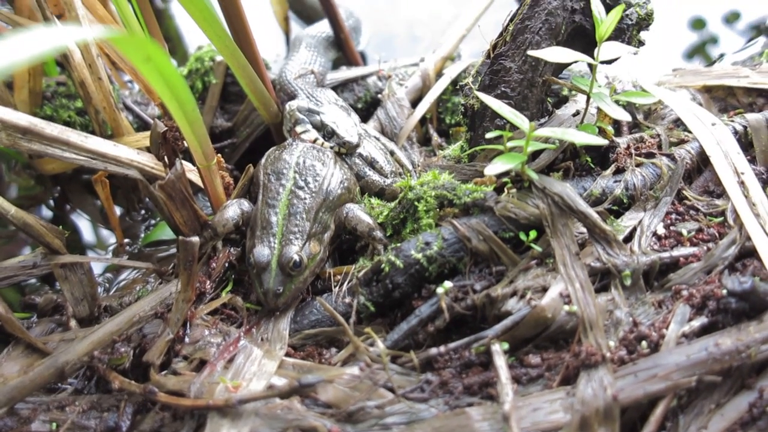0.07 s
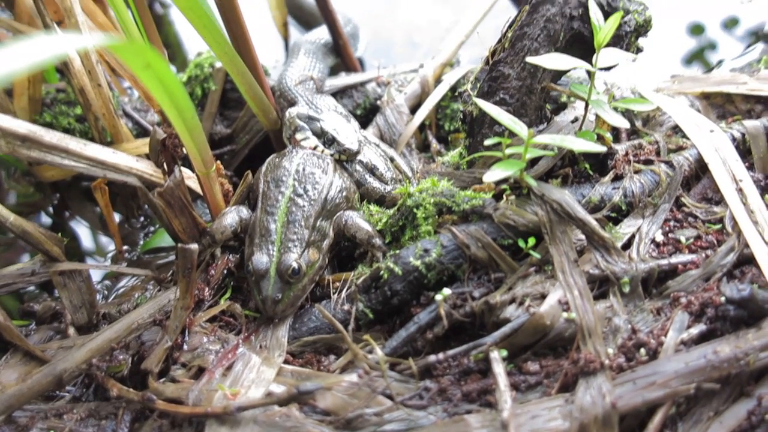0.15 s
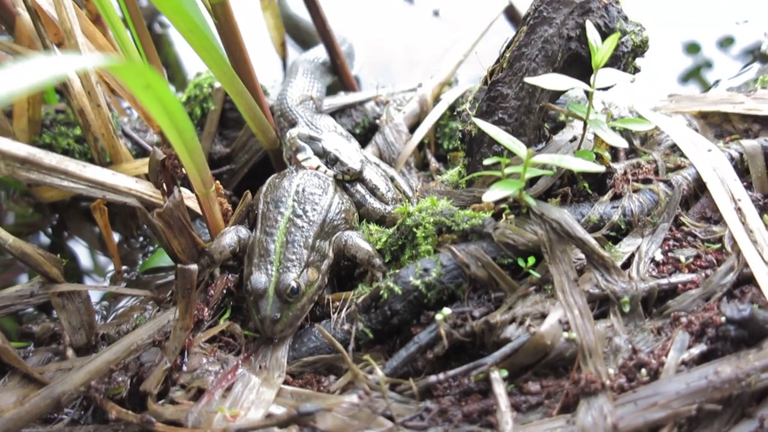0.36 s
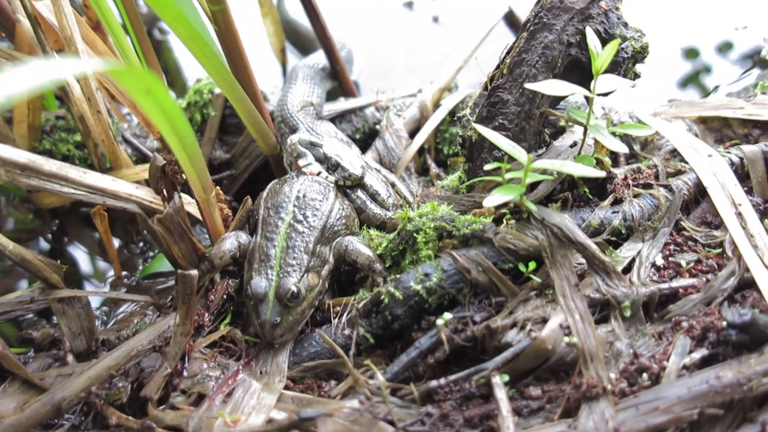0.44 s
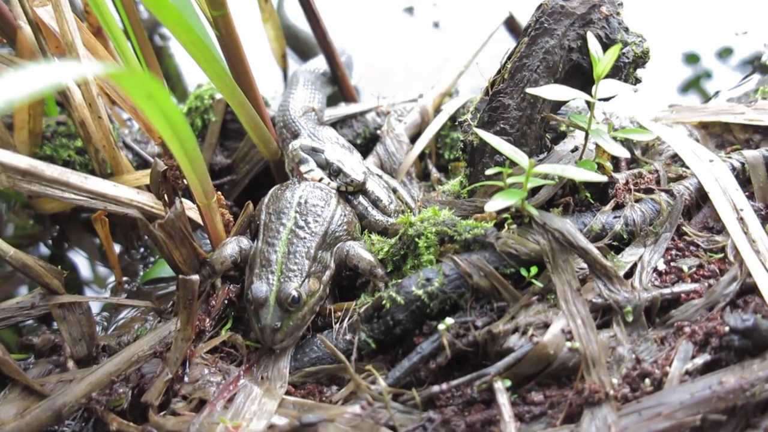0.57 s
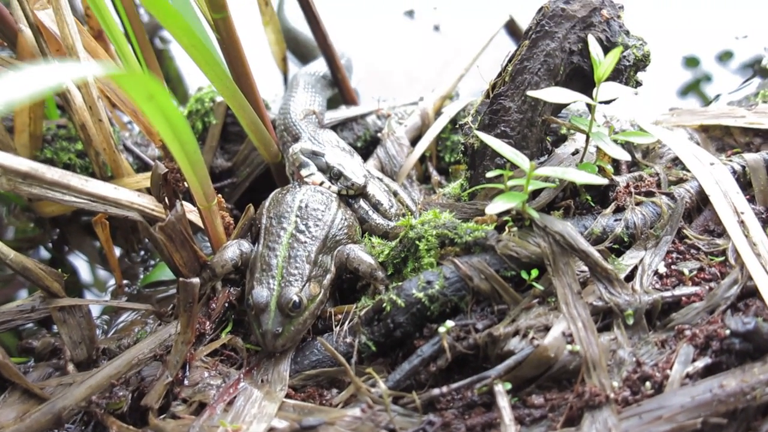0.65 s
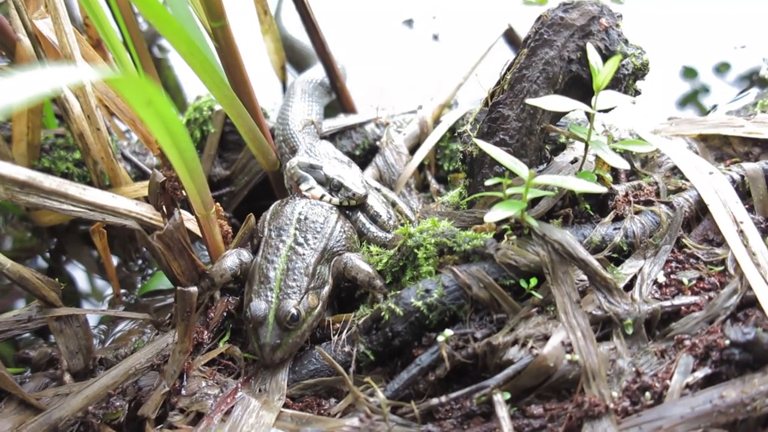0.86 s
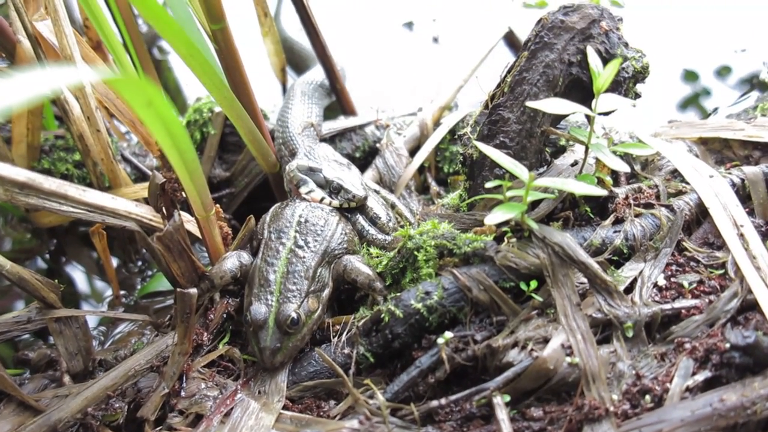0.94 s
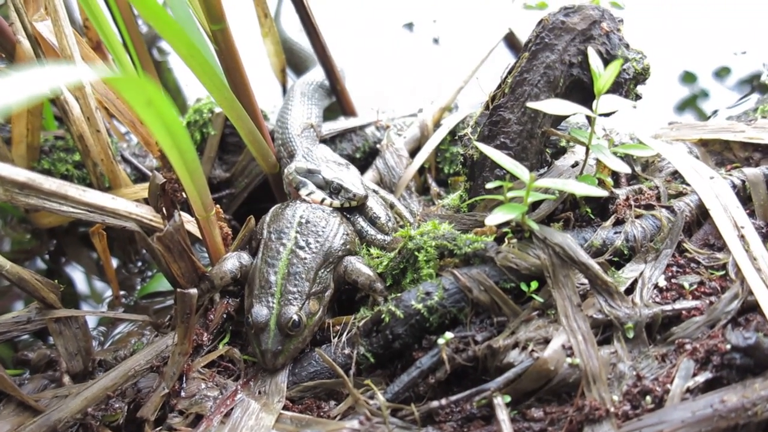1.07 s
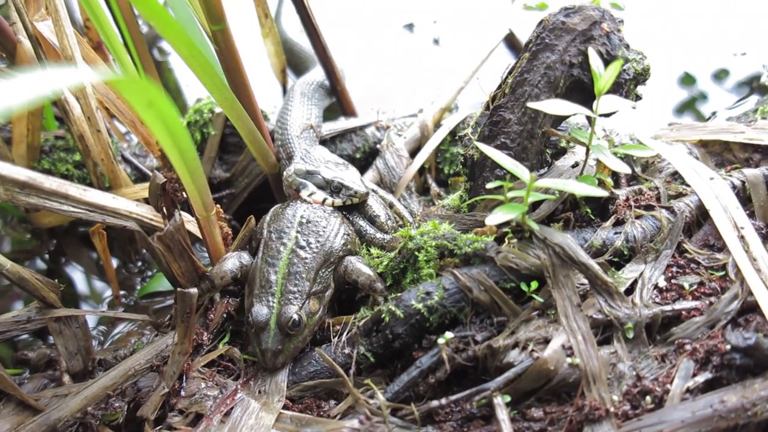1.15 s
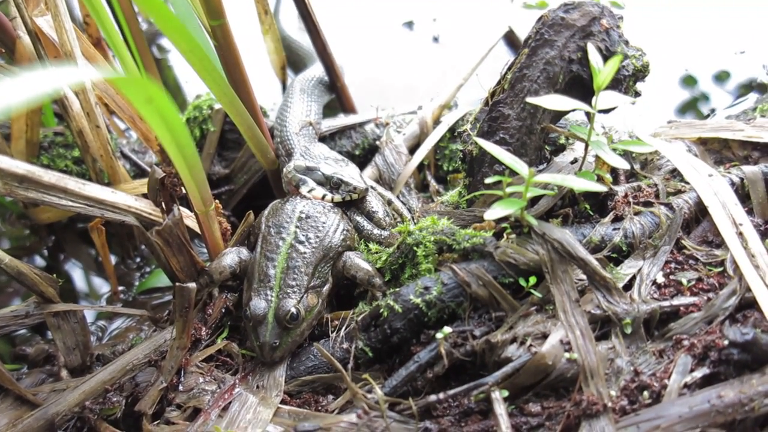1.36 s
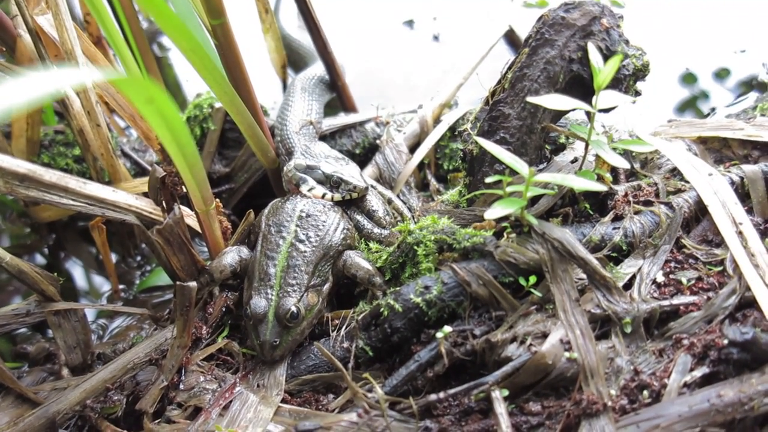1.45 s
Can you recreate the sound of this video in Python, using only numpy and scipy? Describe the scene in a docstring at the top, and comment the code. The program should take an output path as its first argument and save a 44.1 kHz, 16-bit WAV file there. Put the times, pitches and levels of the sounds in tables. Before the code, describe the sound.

A frog close by makes a few soft throat clicks just before 0.2 seconds, then gives one loud, harsh, buzzing cry. Its pitch rises, sags and rises again, dulling to a brief hum that ends at 0.8 seconds. From there until about 1.5 seconds, faint distant birds call, dry stalks tick and leaves rustle softly. A quiet outdoor hush and low rumble lie underneath.

```python
"""A frog's cry among reeds

Seized by a snake, a frog gives a few soft throat clicks, then one harsh cry: a train of sharp snaps
from its voice box that speeds up, sags and speeds up again. As its mouth shuts, the bright ring dies
and leaves a dull hum. Reeds scatter the cry, dry stalks tick, birds call far off and leaves rustle
over open air and a low rumble. A limiter turns everything down when the cry gets loud."""
import sys
import numpy as np
from scipy import signal
from scipy.fft import rfft, irfft, next_fast_len
from scipy.io import wavfile
from scipy.ndimage import uniform_filter1d, minimum_filter1d

SR = 44100
rng = np.random.default_rng(int(sys.argv[2]) if len(sys.argv) > 2 else 0)


def pcm_store(signal):
    """Save signal as 16-bit PCM."""
    levels = np.round(np.clip(np.atleast_2d(signal), -1, 1) * 32767)
    wavfile.write(sys.argv[1], SR, levels.astype(np.int16).T)


N = 66150
TIME = np.arange(N) / SR
SHORT_TIME, SHORT_HZ = np.arange(2048) / SR, np.fft.rfftfreq(2048, 1 / SR)  # for one short sound


def amp(db):
    """Turn decibels into a gain."""
    return 10 ** (np.asarray(db) / 20)


def unit(x):
    """Scale a signal to an average (rms) level of 1."""
    return x / np.sqrt(np.mean(x ** 2) + 1e-20)


def pan(db):
    """Left and right gains; positive leans left."""
    return amp([[db], [-db]])


def along(points, hz, column=1):
    """Read a table between its rows, on a log frequency scale."""
    table = np.array(points)
    return np.interp(np.log(hz + 1), np.log(table[:, 0] + 1), table[:, column])


def filtered(x, response):
    """Scale each frequency of x by response(hz)."""
    size = next_fast_len(N + SR // 4)
    return irfft(rfft(x, size) * response(np.fft.rfftfreq(size, 1 / SR)), size)[..., :N]


def noise(colour):
    """Steady stereo noise, shaped by a table of levels over frequency."""
    return unit(filtered(rng.standard_normal((2, N)), lambda hz: amp(along(colour, hz))))


def ringing(gain):
    """Spectrum of the promptest ringing that has these gains (minimum phase)."""
    cepstrum = irfft(np.log(np.maximum(gain, 1e-6)))
    half = cepstrum.shape[-1] // 2
    fold_forward = np.r_[1, np.full(half - 1, 2), 1, np.zeros(half - 1)]
    return np.exp(rfft(cepstrum * fold_forward))


def burst(colour, fade_s):
    """Spectrum of a stereo puff of noise that dies by 60 dB in fade_s."""
    puff = rng.standard_normal((2, len(SHORT_TIME))) * amp(-60 * SHORT_TIME / fade_s)
    puff /= np.linalg.norm(puff, axis=1, keepdims=True)
    return rfft(puff) * ringing(amp(along(colour, SHORT_HZ)))


def add(out, s, spectrum):
    """Place a short sound, given by its spectrum, at exactly s seconds."""
    start, fraction = divmod(s * SR, 1)
    delay = np.exp(-1j * np.pi * fraction * np.linspace(0, 1, spectrum.shape[-1]))
    wave = irfft(spectrum * delay)
    slot = out[:, int(start):int(start) + wave.shape[-1]]
    slot += wave[:, :slot.shape[1]]


# The tone of open air (frequency [Hz], level [dB])
AIR_TONE = [(25, -20.5), (55, -2.5), (250, 1.5), (420, -5), (800, -12.5), (1400, -14), (2500, -19.5),
            (4000, -18), (5600, -20), (8000, -22.5), (10500, -35), (12500, -46), (15500, -83)]
# How alike the air is in both ears (frequency [Hz], likeness [-1 to 1])
AIR_LIKENESS = [(60, -0.21), (140, -0.59), (340, -0.38), (830, 0.49), (1980, 0.81), (4740, -0.11)]
BACKGROUND_PAN_DB = -0.93


def open_air():
    """A steady hush: one part is the same in both ears, the other is opposite."""
    def shares(hz):
        angle = np.arccos(np.clip(along(AIR_LIKENESS, hz), -1, 1)) / 2
        return np.array([np.cos(angle), np.sin(angle)])
    same, opposite = filtered(noise(AIR_TONE), shares)
    return amp(-50) * pan(BACKGROUND_PAN_DB) * unit(np.array([same + opposite, same - opposite]))


# The tone of the rumble (frequency [Hz], level [dB])
RUMBLE_TONE = [(20, -27.5), (60, -4.5), (150, -5), (300, -6), (700, -9), (2000, -40)]


def rumble(start_db=-47.5, fade_db_per_s=9.5):
    """A low rumble that fades from the start."""
    return noise(RUMBLE_TONE) * pan(BACKGROUND_PAN_DB) * amp(start_db - fade_db_per_s * TIME)


# Each tick (time [s], level [dB], lean to the left [dB], brightness [dB per octave])
STALK_TICKS = [(0.0905, -7.5, -2, 1), (.929, -27.5, 6, 11), (1.062, -23, 1, 8), (1.245, -27.5, 4, 13),
               (1.387, -23.5, -1, 13.5)]
# The tone of a dry stalk (frequency [Hz], level [dB])
STALK_TONE = [(300, -6.5), (900, -1.5), (1500, 9), (2200, -2.5), (4300, -7.5), (5800, -1), (7500, -17),
              (11000, -29), (15000, -49.5)]


def stalks(pivot_hz=4020):
    """Dry stalks tick: tiny puffs of noise, each tilted brighter by its own amount."""
    out = np.zeros((2, N))
    octaves = np.log2(np.maximum(SHORT_HZ, STALK_TONE[0][0]) / pivot_hz)
    for s, db, pan_db, tilt in STALK_TICKS:
        add(out, s, amp(db + tilt * octaves) * pan(pan_db) * burst(STALK_TONE, fade_s=0.013))
    return out


# The throat's tone with the mouth open (frequency [Hz], level [dB])
THROAT_OPEN = [(100, -44), (260, -28), (420, -22), (600, -9), (830, 0), (1000, -1), (1220, -6), (1450, -1),
               (1650, -1.5), (2050, -3), (2500, -12), (3200, -22), (6000, -50), (14000, -100)]
# The throat's tone with the mouth shut (frequency [Hz], level [dB])
THROAT_SHUT = [(100, -54), (260, -16.5), (520, -12.5), (700, 2.5), (790, 4.5), (900, 3), (1100, -8.5),
               (1350, -7), (1600, -10.5), (1900, -16.5), (2700, -23.5), (5000, -59), (14000, -86)]


def throat(s, db, half_shut_s=0.725, shutting_s=0.033):
    """Gains of the throat's resonances, which dull to a hum as the mouth shuts."""
    shut = np.clip((s - half_shut_s) / shutting_s + .5, 0, 1)
    tone_db = (1 - shut) * along(THROAT_OPEN, SHORT_HZ) + shut * along(THROAT_SHUT, SHORT_HZ)
    return amp(24 + db + tone_db) * pan(2.16)


# The open mouth's ring when its pitch is RING_HZ (frequency [Hz], level [dB])
RING_TONE = [(400, -82), (1500, -44), (2330, -9.5), (2600, -12), (2850, -4.5), (3100, -2.5), (3300, 1.5),
             (3500, 0.2), (3800, -7.5), (4400, -12), (4950, -30), (6000, -63), (8000, -55), (14000, -110)]
RING_HZ = 3306


def mouth_ring(s, db, ring_hz, broaden_s=0.14):
    """Gains of the mouth's bright ring, which starts narrow and broadens during the cry."""
    cry_age = max(s - SNAP_RATE[0][0], 0)
    sharpness = 1 + 0.42 * np.exp(-cry_age / broaden_s)
    tone_db = sharpness * along(RING_TONE, SHORT_HZ * RING_HZ / ring_hz)
    return np.sqrt(sharpness) * amp(25 + db + tone_db) * pan(0.37)


# The high, crisp part of a snap (frequency [Hz], left level [dB], right level [dB])
TREBLE_TONE = [(498, -67.5, -70), (2500, -15.5, -22), (4430, 8.5, 12), (5500, 0.5, 2), (7090, -4.5, -3),
               (8200, -11, -11), (10150, -1.5, -11), (10500, -2.5, -8.5), (11800, -1.5, -25.5),
               (12320, -11.5, -34), (13200, -17, -38), (15500, -44.5, -63.5)]


def treble(db, ring_hz, follow_share=0.73, flicker_db=4):
    """Gains of a snap's treble, which flickers at random and partly follows the ring's pitch."""
    flicker = unit(uniform_filter1d(rng.standard_normal((2, len(SHORT_HZ))), size=24))
    shifted_hz = SHORT_HZ * (RING_HZ / ring_hz) ** follow_share
    tone_db = np.array([along(TREBLE_TONE, shifted_hz, column) for column in (1, 2)])
    return amp(20 + db + flicker_db * flicker + tone_db)


# A notch, or gap in the mouth's tone, slides down as the jaws close (time [s], frequency [Hz])
NOTCH_SLIDE = [(.3, 7770), (.48, 7602), (.62, 6000), (.68, 5370), (.712, 4520), (.728, 3620), (.74, 2190)]
# The notch and the peaks beside it (frequency [times the notch frequency], level [dB])
NOTCH_SHAPE = [(.7, -1), (.87, 2.5), (1, -8), (1.16, 3.5), (1.4, -1), (1.7, -1.5), (2.3, -3.5)]
# Dips in the tone that stay put (frequency [Hz], width [Hz], depth [dB])
TONE_DIPS = [(1830, 95, 13), (2270, 170, 12)]


def snap(s, throat_db, ring_db, treble_db, ring_hz):
    """Spectrum of one snap of the voice box, through throat and mouth as they are at time s."""
    power = throat(s, throat_db) ** 2 + mouth_ring(s, ring_db, ring_hz) ** 2
    power += treble(treble_db, ring_hz) ** 2
    notch_hz = np.interp(s, *np.transpose(NOTCH_SLIDE))
    notch_db = np.interp(SHORT_HZ / notch_hz, *np.transpose(NOTCH_SHAPE))
    dips_db = sum(depth * np.exp(-((SHORT_HZ - hz) / width) ** 2) for hz, width, depth in TONE_DIPS)
    return ringing(amp(notch_db - dips_db) * np.sqrt(power))


# Each click (time [s], throat level [dB], ring level [dB], treble level [dB], ring pitch [Hz])
THROAT_CLICKS = [(0.1547, -34, -58, -56, 2890), (0.165, -30, -66, -66, 2900),
                 (0.1711, -25.5, -55, -67, 2900), (0.1783, -23.5, -33.5, -48.5, 2720),
                 (0.2047, -22.5, -12, -40.5, 3005)]


def clicks():
    """The voice box gives a few soft, single snaps before the cry."""
    out = np.zeros((2, N))
    for s, *shape in THROAT_CLICKS:
        add(out, s, snap(s, *shape))
    return out


# The tone of the echo from the reeds (frequency [Hz], level [dB])
REED_ECHO = [(150, -23), (900, -9.5), (3000, -16), (6000, -22), (9500, -13.5), (15000, -34)]
# The tone of the echo from dead leaves under the frog (frequency [Hz], level [dB])
LITTER_ECHO = [(500, -37), (3000, -24.5), (6000, -5.5), (9500, -0.5), (12000, -5), (15000, -19.5)]


def bank_echo():
    """The echo of one sharp click: reeds scatter it, and dead leaves add a brighter, shorter tail."""
    return irfft(burst(REED_ECHO, fade_s=0.0594) + burst(LITTER_ECHO, fade_s=0.014))


# How fast the voice box snaps (time [s], rate [snaps per s])
SNAP_RATE = [(0.2335, 61.7), (0.25, 106.1), (0.275, 160.6), (0.31, 175.8), (0.345, 149.3), (0.385, 129.2),
             (0.422, 94.1), (0.452, 121.6), (0.5, 127.0), (0.585, 130.3), (0.61, 144.0), (0.645, 145.2),
             (0.685, 150.2), (0.71, 185.4), (0.74, 246.8), (0.79, 276.9)]
# The cry's course (time [s], throat level [dB], ring level [dB], treble level [dB], ring pitch [Hz])
CRY_COURSE = [(0.2335, -8.5, 2, -31.5, 3094), (0.27, -8.5, 3, -31.5, 3184), (0.33, -9, 3, -31.5, 3257),
              (0.42, -9, 2, -33, 3285), (0.5, -9, 0.5, -29, 3290), (0.58, -4, 2.5, -26, 3230),
              (0.659, -1, 1, -25.2, 3120), (0.7, 0.8, -3.5, -24, 2890), (0.718, 1.9, -9, -31.4, 2790),
              (0.742, -7.5, -32.5, -41.5, 2930), (0.771, -16, -58, -59.5, 2840),
              (0.789, -36.5, -50.5, -62, 3200)]


def cry(jitter_s=.00004, shimmer_db=0.41):
    """One snap for each cycle of the voice box, slightly uneven in timing and strength."""
    out = np.zeros((2, N))
    rate_times, rates = np.transpose(SNAP_RATE)
    t = np.arange(rate_times[0], rate_times[-1], 1 / SR)
    cycles = np.cumsum(np.interp(t, rate_times, rates)) / SR
    snap_times = np.interp(np.arange(int(cycles[-1]) + 1), cycles, t)
    course_times, *columns = np.transpose(CRY_COURSE)
    for s in snap_times:
        shape = [np.interp(s, course_times, column) for column in columns]
        add(out, s + jitter_s * rng.normal(), amp(shimmer_db * rng.normal()) * snap(s, *shape))
    return out


# Each bird note (time [s], length [s], pitch [Hz], glide [Hz per s], blur width [Hz], level [dB])
BIRD_NOTES = [(.82, .11, 6900, 0, 1100, -64), (.97, .28, 1610, -500, 50, -59),
              (1.0, .12, 5400, 0, 400, -65), (1.04, .15, 2070, -950, 60, -58),
              (1.10, .04, 4100, 0, 400, -58), (1.205, .05, 1240, 500, 130, -50),
              (1.23, .16, 1300, -100, 220, -55), (1.39, .11, 4080, 2400, 300, -60)]


def birds():
    """Birds sing gliding notes, blurred by distance."""
    out = np.zeros((2, N))
    for s, length, hz, glide, width, db in BIRD_NOTES:
        age = TIME - s
        blur = filtered(rng.standard_normal((2, 2, N)), lambda f: np.exp(-(2 * f / width) ** 2))
        phase = 2 * np.pi * (hz + glide * age / 2) * age
        note = unit(blur[0] * np.cos(phase) + blur[1] * np.sin(phase))
        swell = np.sin(np.pi * np.clip(age / length, 0, 1))
        out += amp(db + 0.5) * note * swell
    return out


# How the rustle swells and fades (time [s], level [dB])
RUSTLE_LEVEL = [(.95, -86), (1.11, -51.5), (1.25, -55.5), (1.32, -63), (1.4, -62.5), (1.5, -76)]
# The tone of dry leaves (frequency [Hz], level [dB])
LEAF_TONE = [(100, -5), (500, 8.5), (1500, -1), (2600, -3), (4300, 4.5), (7000, -8), (9000, -4),
             (11000, -18.5), (15000, -40.5)]


def leaves():
    """Dry leaves rustle softly after the cry."""
    return noise(LEAF_TONE) * amp(np.interp(TIME, *np.transpose(RUSTLE_LEVEL)))


def scene():
    """The quiet bank, the close frog and its echoes."""
    bank = open_air() + leaves() + rumble() + birds() + stalks()
    echo = bank_echo()
    frog = clicks() + cry()
    return bank + frog + signal.fftconvolve(frog, echo, axes=1)[:, :N]


def record(dry, ceiling_db=-7.5, release_db_per_s=6.5, top_hz=16000):
    """A limiter turns loud peaks down at once and lets go slowly; the highest treble is cut off."""
    peak_db = 20 * np.log10(np.abs(dry).max(axis=0) + 1e-9)
    over_db = np.maximum(peak_db - ceiling_db, 0)
    release_db = release_db_per_s * TIME
    duck_db = np.maximum.accumulate(over_db + release_db) - release_db
    gain = uniform_filter1d(minimum_filter1d(amp(-duck_db), size=89), size=89)  # smooth over 2 ms
    return filtered(dry * gain, lambda hz: hz < top_hz)


dry = scene()
out = record(dry)
pcm_store(out)
```